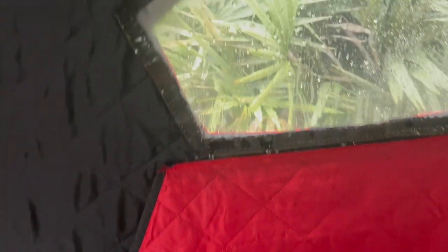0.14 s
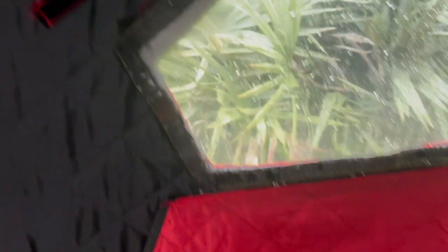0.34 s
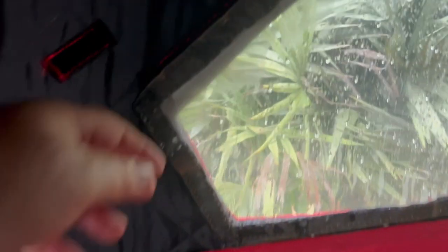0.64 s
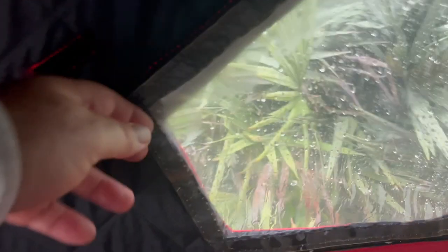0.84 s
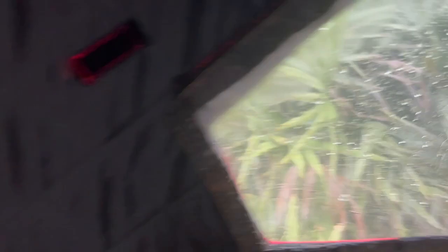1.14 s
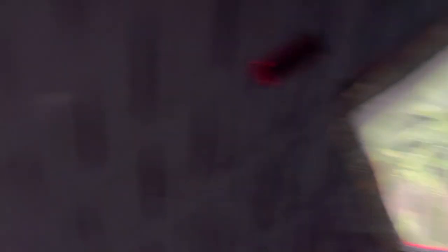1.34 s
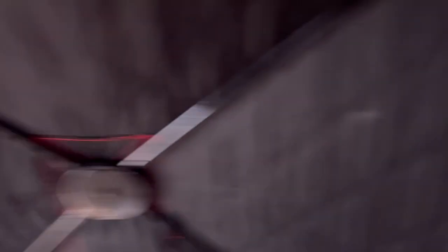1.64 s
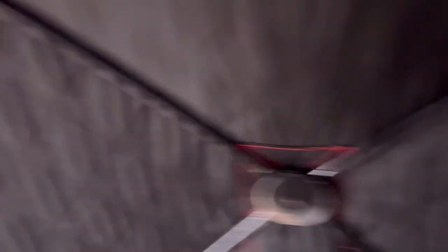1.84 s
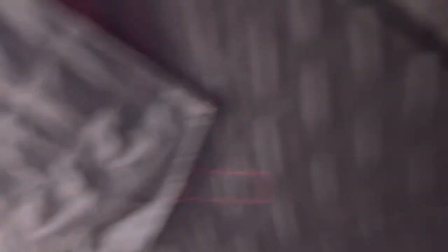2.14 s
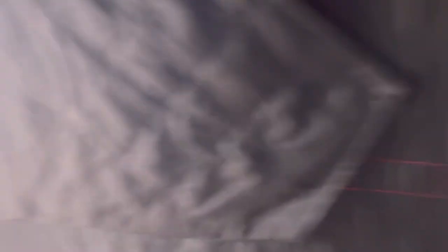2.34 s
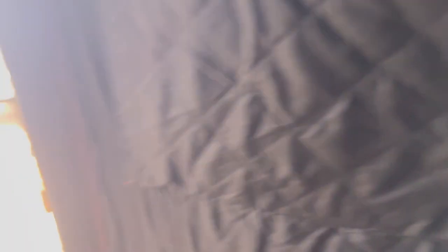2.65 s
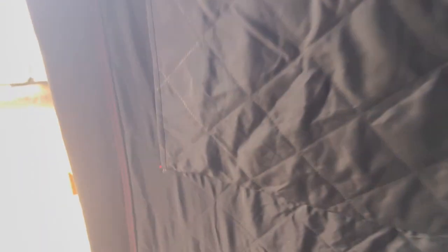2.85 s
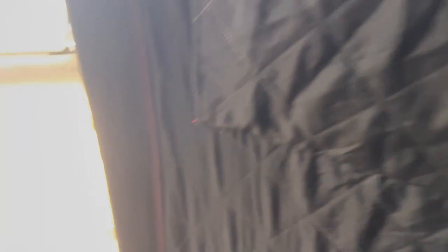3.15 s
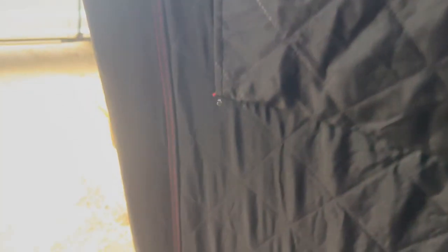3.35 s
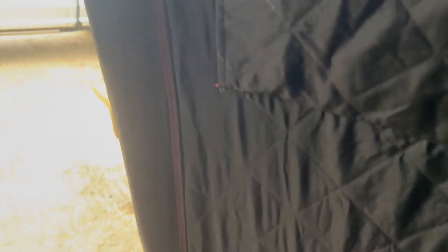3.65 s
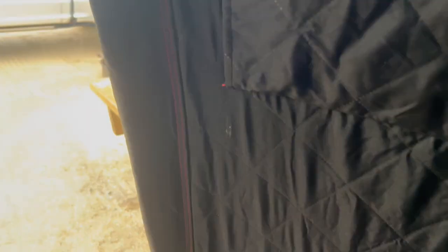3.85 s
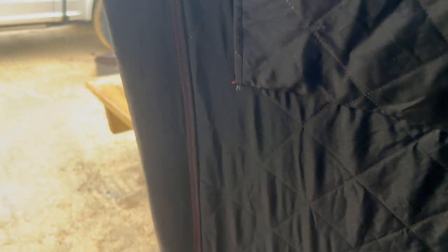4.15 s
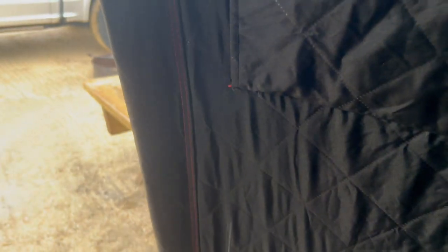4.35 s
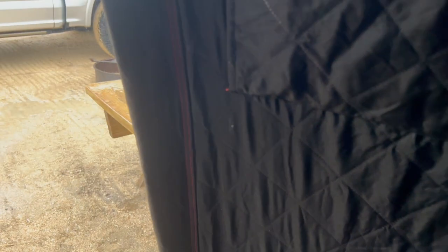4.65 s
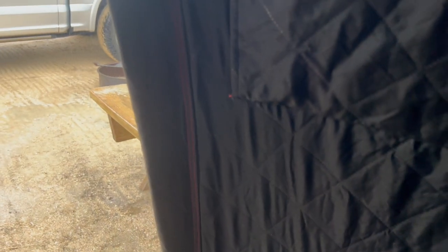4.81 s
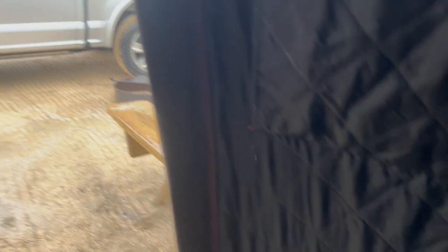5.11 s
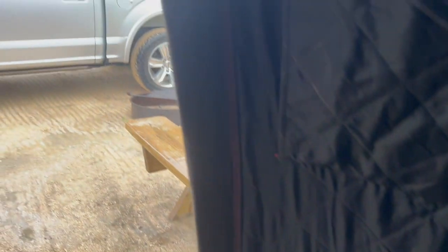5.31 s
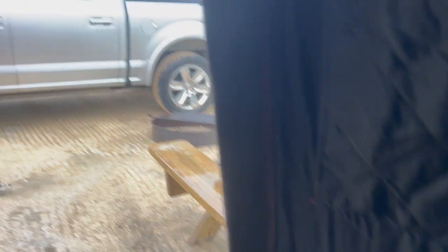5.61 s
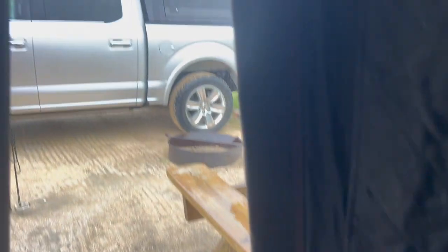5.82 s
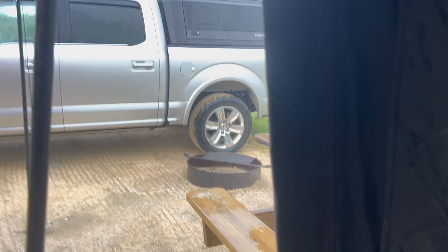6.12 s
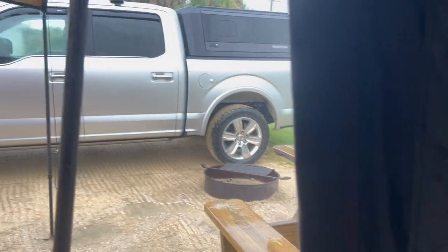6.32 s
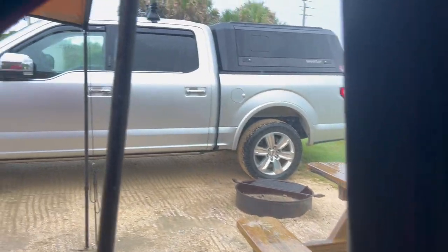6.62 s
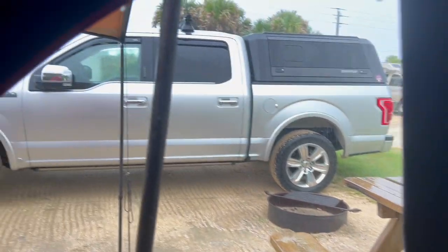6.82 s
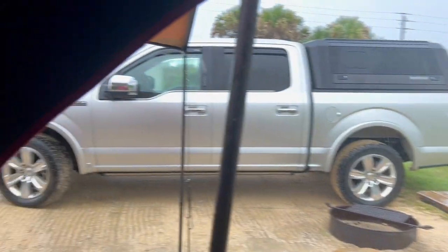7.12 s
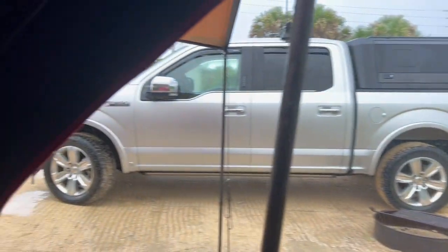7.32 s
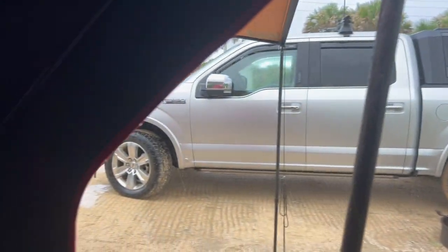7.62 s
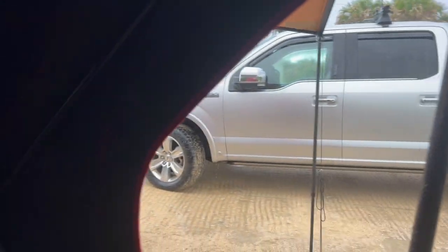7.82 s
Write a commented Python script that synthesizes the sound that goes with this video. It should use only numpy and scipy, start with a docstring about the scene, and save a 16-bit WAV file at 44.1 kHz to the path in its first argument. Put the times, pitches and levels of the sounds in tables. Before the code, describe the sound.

Low machine throb and blowing air fill a tent while rain hisses on taut fabric; a few sharp drops snap close overhead later on.

```python
"""An air conditioner rumbles, blows and hums, heard inside a tent in steady rain.
Its noise bands and wavering tones reach the two microphone ports of a handheld camera turning from window to door.
Rain is noise mixed with random taps: a wash over the site and ticking on the taut roof.
A few fat drops, short ringing packets with tent echoes, snap close overhead.
Near the start a hand lets go of the window flap: a burst of cloth noise brushes by and a few taps flick."""
import sys
import numpy as np
from scipy import signal
from scipy.fft import rfft, irfft, next_fast_len
from scipy.io import wavfile
from scipy.ndimage import uniform_filter1d, map_coordinates

SR = 44100
rng = np.random.default_rng(int(sys.argv[2]) if len(sys.argv) > 2 else 0)


def digitize_waveform(pressure):
    """Quantize a signal to 16-bit integers and store it at the path in sys.argv[1].

    Rows of a 2-D input are taken as channels; values are limited to [-1, 1].
    """
    field = np.atleast_2d(pressure).T
    bounded = np.clip(field, -1, 1)
    quanta = np.round(bounded * 32767).astype(np.int16)
    wavfile.write(sys.argv[1], SR, quanta)


N = 351374

# fainter tones of the machine: pitch_hz, level_db, width_hz
WHINES = [(54, -33, 5), (171, -34, 4), (200, -41, 3), (757, -53, 8), (882, -50, 6), (2765, -62, 15),
          (5810, -62, 40), (6155, -66, 12)]
# clearest drops on the roof, before the sheet colours them:
# start_s, level_db (over 1 ms), pitch_hz, ring_cycles, left_lead_ms
DROPS = [(0.619, -28, 5200, 0.33, 0.4), (0.7944, -29, 4970, 0.25, 0.014), (1.6878, -39, 11500, 0.46, 0),
         (1.926, -40, 7000, .3, -0.031), (1.999, -30.5, 5800, 0.33, 0.0025), (2.1, -41, 7500, 0.42, 0),
         (2.332, -32.5, 7000, 0.58, .3), (2.418, -33.5, 11000, 0.44, 0), (2.598, -32, 5800, 0.48, 0.025),
         (2.8704, -35, 10300, 0.46, 0), (3.0465, -40, 11000, .4, 0), (3.2158, -40, 5000, .3, 0),
         (3.332, -33, 10500, 0.49, .15), (3.4062, -32, 4500, 1.1, 0.015), (3.6744, -45, 9500, .4, 0),
         (3.79, -33, 9300, 0.67, -.2), (3.937, -31.5, 7800, .35, 0.032), (4.122, -32, 5800, 0.39, 0.0065),
         (4.1886, -36, 9300, .4, 0), (4.2164, -36, 11500, .3, 0), (4.2531, -35, 8200, 0.3, 0),
         (4.3543, -38, 11500, .35, 0), (4.444, -35, 6000, .7, 0), (4.6124, -35, 11500, .4, 0),
         (4.6847, -30, 5600, 0.27, 0.023), (4.7675, -35.5, 7700, 0.55, 0), (4.808, -29, 8800, 0.26, .3),
         (4.9181, -39, 8800, .3, 0), (5.022, -16.5, 5400, 0.45, 0.24), (5.101, -39, 8500, 0.44, 0),
         (5.154, -36, 8300, 1, .4), (5.402, -32, 7000, .35, .4), (5.4692, -31.5, 5200, 0.77, 0),
         (5.513, -31, 9600, .4, 0), (5.5474, -38, 9000, .25, 0), (5.5654, -33, 10000, .35, 0.034),
         (5.8995, -33, 12000, 0.22, .4), (6.0403, -19, 7360, 0.34, 0), (6.0639, -35, 8800, .5, 0),
         (6.1464, -30, 7160, 0.44, -0.43), (6.205, -32, 7400, 0.34, 0), (6.264, -34, 7000, .5, 0),
         (6.3588, -33.5, 8800, 0.36, 0), (6.6778, -28, 8100, 1.1, 0.072), (6.6795, -20, 5500, 0.85, 0.014),
         (6.8324, -31.5, 8900, 0.7, -.4), (6.851, -37, 7800, .7, 0), (7.306, -35.5, 8600, .35, 0),
         (7.6181, -35, 11200, 0.5, 0), (7.7909, -41, 11500, .4, 0)]
# drops that ring on with a tiny plip: start_s, level_db (over 1 ms, before the sheet), pitch_hz, ring_cycles
PLIPS = [(.619, -39, 5400, 6), (3.407, -37, 4900, 6), (4.1217, -33.5, 5550, 8)]
# the flap snaps straight, with small catches before and after:
# start_s, level_db (over 1 ms, before the sheet), pitch_hz, ring_cycles
FLICKS = [(.9348, -31, 8500, 0.45), (.9362, -34, 4080, 1), (.9378, -27, 10500, 0.9),
          (.939, -24.5, 4220, 1.2), (.9392, -28, 8000, 0.39), (.955, -37, 6000, .4), (.988, -38, 5200, .4)]

# spectra of each layer: frequency_hz, relative_level_db
THROB_SPECTRUM = [(15, -42), (27, -23), (38, -12.5), (52, 1.5), (64, -0.5), (85, -12), (150, -27),
                  (600, -120)]
RUMBLE_SPECTRUM = [(35, -46), (58, -6.5), (78, 0), (115, 0), (165, -3.5), (215, -16.5), (300, -29),
                   (600, -90), (2500, -120)]
AIR_SPECTRUM = [(120, -13), (220, 0), (290, 1.5), (400, -1), (470, -1.5), (600, -10), (900, -19.5),
                (2500, -53), (9000, -120)]
WASH_SPECTRUM = [(250, -24), (550, 3.5), (720, 1), (900, -2), (1100, -0.5), (1500, -3.5), (2000, -7.5),
                 (3000, -18.5), (5000, -26.5), (15000, -76)]
HISS_SPECTRUM = [(1200, -2.5), (2800, 9.5), (4000, 6), (5000, 5), (6000, 6.5), (7200, 0.5), (9000, -0.5),
                 (10600, -6.5), (12000, -20.5), (13500, -17), (15500, -14.5)]
CLOTH_SPECTRUM = [(2000, -32), (3200, -1), (4200, 1), (5500, -3), (8000, -7.5), (11200, -2.5), (12500, -17),
                  (15500, -8)]
# treble radiated by the stiff sheet: frequency_hz, gain_db
SHEET_SPECTRUM = [(2000, -50), (2900, -11), (3700, 3), (9500, 2), (11000, 3.5), (12800, -9), (15500, 7)]
# the thin walls return the highs of the drops a little more strongly: frequency_hz, gain_db
WALL_RETURN = [(4000, 1), (6000, 1.5), (8500, 1.5), (12000, 4)]

# likeness of a surrounding sound at the two microphone ports: frequency_hz, correlation (no unit)
PORT_LIKENESS = [(60, 1), (140, 0.96), (220, 0.97), (330, 0.74), (500, 0.65), (780, 0.15), (1100, 0.33),
                 (1700, 0.07), (2400, 0.46), (4300, 0.3), (5400, 0.22), (7000, 0.28), (8300, 1), (16000, 1)]
# phase between the ports: frequency_hz, left_lead_rad
PORT_PHASE = [(100, 0.065), (480, -0.52), (870, 0.96), (1600, -1.3), (2700, 0.73), (7500, 0.97),
              (8400, -0.11)]
# decay of the tent's scatter: frequency_hz, t60_s
TENT_DECAY = [(2000, 0.027), (6000, 0.11), (14000, 0.21)]
# echoes of the nearest wall and floor: delay_s, level_db
ECHOES = [(.0021, -16), (.0069, -12.5), (.0081, -18)]
# the microphone passes a crest (+) or node (-) of a standing wave: time_s, frequency_hz, gain_db
PASSES = [(.45, 461, 8), (1.45, 590, -11), (1.1, 780, 6.5), (2.1, 298, 6.5), (2.35, 570, 3),
          (4.3, 290, -10), (5.95, 502, 6.5), (7.0, 185, 7), (7.5, 826, 5.5)]

# deep throb of the cabinet, before its trim: time_s, level_db
THROB_LEVEL = [(0, -22.5), (.8, -24.5), (1.5, -31), (2.1, -21.5), (2.45, -24), (2.9, -21), (4.15, -31),
               (5.4, -22), (6.1, -26.5), (7.1, -36), (7.5, -18), (7.95, -31)]
# duct rumble, before its surges: time_s, level_db
RUMBLE_LEVEL = [(0, -21.5), (.4, -17), (1.3, -19), (2.05, -17.5), (3.1, -17.5), (3.5, -17.5), (4.1, -19),
                (5.3, -18.5), (5.8, -21.5), (6.4, -19.5), (7.7, -19)]
# swells added to the compressor's low bed: time_s, half_duration_s, peak_db
COMPRESSOR_SWELLS = [(2.7, 0.45, -41), (5.65, 0.42, -30), (6.95, 0.24, -34.5)]
# the patter thickens (+) or thins (-): time_s, half_duration_s, gain_db
RAIN_SWELLS = [(2.46, 0.12, 1.5), (3.08, 0.12, -0.2), (6.5, 0.18, 1.5), (1.9, 0.63, -2)]

THROB_TRIM_DB = -1.9
SURGE_DB, SURGES_PER_S = 0.6, 14  # depth and rate of the rumble's random surges
AIR_DB, AIR_RISE_DB_PER_S = -29, 0.02  # level at the start, almost steady
FAN_HZ, FAN_SAG_S, SAG_HZ_PER_S = 335.2, 4.1, 2.9  # the sag begins at FAN_SAG_S
FAN_DB, SAG_DB_PER_S = -34.8, 1.1
FAN_SHADE_DB, FAN_SHADE_S = 9.5, 0.42  # deficit at the start, lifting as the microphone leaves the window
COMPRESSOR_DB, COMPRESSOR_HZ, COMPRESSOR_SAG_HZ_PER_S = -50.5, 232, 0.53
# rain at the start, before the mix inside each layer, growing as the microphone nears the door
WASH_DB, WASH_DB_PER_S = -34.5, 0.18
HISS_DB, HISS_DB_PER_S = -44.5, 0.21
PATTER_HZ, PATTER_OCTAVES = 2000, 0.68  # centre and half width of the band that swells
# the flap sliding off the fingers: a quick rise, a peak, a slow slide and a release
BRUSH_S, BRUSH_DB, BRUSH_RISE_DB_PER_S = 0.926, -33.5, 260
BRUSH_SLIDE_S, BRUSH_SLIDE_DB_PER_S = 0.079, 95
BRUSH_RELEASE_DB_PER_S = 450  # added to the slide's fall
SHEET_LEAD_S_PER_HZ = 8e-8  # highs run ahead of lows
PASS_WIDTH, PASS_S = 0.059, 0.45  # half width as a share of the frequency, half duration
RIPPLE_DB, RIPPLE_FROM_HZ = 1.3, 550  # rms depth and lowest frequency
DIRECTION_TOP_HZ = 7200  # single drops have a direction only below this
TREBLE_LAG_S = 1 / 3600  # left port behind right above the last PORT_PHASE point
TOP_HZ = 15900  # upper band limit of the microphone


def amp(db):
    """Decibels to gain."""
    return 10 ** (np.asarray(db) / 20)


def unit(x):
    """x at rms 1."""
    return x / np.sqrt(np.mean(x ** 2) + 1e-20)


def seconds():
    """The time of every sample."""
    return np.arange(N) / SR


def along(points, hz):
    """Values of (Hz, value) points, read on a log frequency axis."""
    f, v = np.transpose(points)
    return np.interp(np.log(hz + 1), np.log(f + 1), v)


def curve(rows):
    """(s, value) rows joined by straight lines, one value per sample."""
    s, value = np.transpose(rows)
    return np.interp(seconds(), s, value)


def bell(centre_s, half_s):
    """A smooth swell of height 1 that falls to 1/e at half_s from its centre."""
    return np.exp(-((seconds() - centre_s) / half_s) ** 2)


def wobble(rate):
    """A smooth random curve, rate knots a second."""
    s = np.arange(0, N / SR + .001, .001)
    knots = rng.standard_normal(int(N * rate / SR) + 4)
    return np.interp(seconds(), s, map_coordinates(knots, [s * rate]))


def random_field(shape, hz_bins, frames):
    """Smoothed random values of rms 1 over frequency and time."""
    field = uniform_filter1d(rng.standard_normal(shape), size=hz_bins, axis=0)
    return unit(uniform_filter1d(field, size=frames, axis=1))


def filtered(x, response):
    """x times a complex response of frequency."""
    m = next_fast_len(N + 8192)
    return irfft(rfft(x, m) * response(np.fft.rfftfreq(m, 1 / SR)), m)[..., :N]


def coloured(x, spectrum):
    """x through a (Hz, dB) spectrum."""
    return filtered(x, lambda hz: amp(along(spectrum, hz)))


def diffuse(pair):
    """Two unrelated signals mixed to the likeness of a sound from all around at the two ports."""
    def mid_side_gains(hz):
        turn = np.arccos(np.clip(along(PORT_LIKENESS, hz), -1, 1)) / 2
        return np.array([np.cos(turn), np.sin(turn)])
    mid, side = filtered(pair, mid_side_gains)
    return np.array([mid + side, mid - side])


def even_noise(spectrum):
    """Steady stereo noise of rms 1."""
    return unit(coloured(diffuse(rng.standard_normal((2, N))), spectrum))


def rush(spectrum, patchy_db):
    """Stereo noise of rms 1 with patches of random gain over frequency and time."""
    z = signal.stft(rng.standard_normal((2, N)), nperseg=512)[2]
    patches = amp(patchy_db * random_field(z.shape[1:], hz_bins=8, frames=12))
    pair = signal.istft(z * patches, nperseg=512)[1][:, :N]
    return unit(coloured(diffuse(pair), spectrum))


def through_tent(x):
    """Narrow bands swell or dip as the microphone crosses standing waves; many higher ones ripple."""
    hz, t, z = signal.stft(x, SR, nperseg=4096)
    gain_db = 0
    for s, centre_hz, db in PASSES:
        off_centre = (hz[:, None] / centre_hz - 1) / PASS_WIDTH
        gain_db = gain_db + db * np.exp(-((t - s) / PASS_S) ** 2 - off_centre ** 2)
    ripple = random_field(z.shape[1:], hz_bins=7, frames=9)
    gain_db = gain_db + RIPPLE_DB * ripple * (hz[:, None] > RIPPLE_FROM_HZ)
    return signal.istft(z * amp(gain_db), SR, nperseg=4096)[1][:, :N]


def air_conditioner():
    """Cabinet throb, duct rumble and an air stream, with the tones of fan and compressor."""
    throb = amp(curve(THROB_LEVEL) + THROB_TRIM_DB) * even_noise(THROB_SPECTRUM)
    rumble_db = curve(RUMBLE_LEVEL) + SURGE_DB * wobble(SURGES_PER_S)
    rumble = amp(rumble_db) * even_noise(RUMBLE_SPECTRUM)
    air_db = AIR_DB + AIR_RISE_DB_PER_S * seconds()
    air = amp(air_db) * through_tent(rush(AIR_SPECTRUM, patchy_db=0.8))
    # two-row gains are the left and right port, in dB
    low_noise = (throb + rumble) * amp([[.25], [-.25]])
    return low_noise + air + fan() * amp([[-1], [1]]) + compressor() + whines()


def hum(hz, waver_hz, flutter_db):
    """A machine tone of rms 1, unsteady in speed and strength."""
    phase = 2 * np.pi * np.cumsum(hz + waver_hz * wobble(12)) / SR
    return unit(np.sin(phase) * amp(flutter_db * wobble(4.3)))


def fan():
    """The fan's tone comes forward, wavers about one pitch, then slowly sags and fades."""
    sag_s = np.maximum(seconds() - FAN_SAG_S, 0)
    level_db = FAN_DB - FAN_SHADE_DB * bell(0, FAN_SHADE_S) - SAG_DB_PER_S * sag_s
    return amp(level_db) * hum(FAN_HZ - SAG_HZ_PER_S * sag_s, waver_hz=0.7, flutter_db=2.7)


def compressor():
    """A low, slowly sinking tone that swells out of a faint bed."""
    swells = sum(amp(db) * bell(s, half_s) for s, half_s, db in COMPRESSOR_SWELLS)
    hz = COMPRESSOR_HZ - COMPRESSOR_SAG_HZ_PER_S * seconds()
    return (amp(COMPRESSOR_DB) + swells) * hum(hz, waver_hz=0.36, flutter_db=1.0)


def whines():
    """Fainter machine tones, each broadened by a random strength at either port."""
    tones = 0
    for hz, db, width_hz in WHINES:
        strength = unit(np.array([wobble(2 * width_hz), wobble(2 * width_hz)]))
        tones = tones + amp(db) * strength * hum(hz, waver_hz=1.43, flutter_db=1.5)
    return diffuse(tones)


def taps(rows, size=160):
    """Taps on taut fabric, rows (s, dB, Hz, cycles): wave packets that rise fast and ring away."""
    s, db, hz, cycles = np.transpose(rows)[:, :, None]
    k = np.arange(size)
    turns = np.clip(hz, 2500, 14000) * k / SR
    envelope = turns * np.exp(-turns / np.maximum(cycles, .1))
    packet = envelope * np.sin(2 * np.pi * (turns + rng.random(s.shape)))
    # each packet carries the energy of its level held for one millisecond
    packet *= amp(db) * np.sqrt(SR / 1000 / np.sum(packet ** 2, axis=1, keepdims=True))
    places = np.round(s * SR).astype(int) + k
    return np.bincount(places.ravel(), packet.ravel(), N)[:N]


def shower(count, pitch_hz, spread_db, cycles):
    """Random taps from all around: most lie near one level, a few far above (below if spread is negative)."""
    def one_port():
        size = np.minimum(rng.exponential(size=count), 3)
        hz = pitch_hz * np.exp(0.3 * rng.standard_normal(count))
        s = rng.random(count) * N / SR
        return taps(np.column_stack([s, spread_db * size, hz, np.full(count, cycles)]))
    return diffuse(np.array([one_port(), one_port()]))


def rain():
    """Far rain is a soft wash with dull patter; on the tent it is a hiss full of fine drops."""
    wash_db = WASH_DB + WASH_DB_PER_S * seconds()
    hiss_db = HISS_DB + HISS_DB_PER_S * seconds()
    flurry_db = 0.48 * wobble(24)  # the level flickers as drops arrive in small clumps
    patter = shower(count=1300, pitch_hz=3260, spread_db=2.0, cycles=0.27)
    wash = amp(1.91) * rush(WASH_SPECTRUM, patchy_db=1.1) + amp(-8) * unit(coloured(patter, WASH_SPECTRUM))
    swell_db = sum(db * bell(s, half_s) for s, half_s, db in RAIN_SWELLS)
    band = filtered(wash, lambda hz: np.exp(-(np.log2((hz + 1) / PATTER_HZ) / PATTER_OCTAVES) ** 2))
    wash = wash + (amp(swell_db) - 1) * band
    fine = shower(count=1800, pitch_hz=5100, spread_db=6.5, cycles=0.72)
    hiss = amp(1.5) * rush(HISS_SPECTRUM, patchy_db=1.7) + amp(-7.5) * unit(coloured(fine, HISS_SPECTRUM))
    far = amp(wash_db) * wash * amp([[-1], [1]])
    near = amp(hiss_db) * hiss * amp([[.7], [-.7]])
    return amp(flurry_db) * through_tent(far + near)


def fabric(x):
    """The stiff coated sheet radiates mostly treble, and carries the highs a little ahead of the lows."""
    def sheet(hz):
        lead = np.exp(1j * np.pi * SHEET_LEAD_S_PER_HZ * (hz - 7000) ** 2)
        return amp(along(SHEET_SPECTRUM, hz)) * lead
    return filtered(x, sheet)


def placed(x, s, lead_ms):
    """A time lead at one port sets each drop's direction; its top treble stays in the middle."""
    n = np.arange(N)
    body = filtered(x, lambda hz: hz < DIRECTION_TOP_HZ)
    shift = np.interp(seconds(), s, lead_ms) / 1000 * SR / 2  # samples, half at each port
    return x - body + np.array([map_coordinates(body, [n + shift]), map_coordinates(body, [n - shift])])


def tent_echo(x, scatter_db):
    """Wall and floor return distinct echoes, joined by a short scatter that decays by frequency."""
    hz, t, z = signal.stft(rng.standard_normal((2, SR // 8)), SR, nperseg=128)
    decay = amp(-60 * t / along(TENT_DECAY, hz)[:, None])
    tail = signal.istft(z * decay, SR, nperseg=128)[1]
    tail[:, :SR // 600] = 0  # no scatter before the nearest surface
    scatter = signal.fftconvolve(x[None], tail / np.linalg.norm(tail[0]), axes=1)[:, :N]
    early = sum(amp(db) * np.pad(x, (round(s * SR), 0))[:N] for s, db in ECHOES)
    return early + amp(scatter_db) * diffuse(scatter)


def roof_drops():
    """Single drops snap on the roof and scatter round the tent."""
    drops = np.array(DROPS)
    snaps = fabric(taps(drops[:, :-1]) + taps(PLIPS, size=600))
    direct = placed(snaps, drops[:, 0], drops[:, -1]) * amp([[.6], [-.6]])
    return direct + tent_echo(coloured(snaps, WALL_RETURN), scatter_db=-8.5)


def flap():
    """Nylon slides off the fingers, catching on the skin, and flicks back against the window."""
    t = seconds() - BRUSH_S
    rise_db = BRUSH_RISE_DB_PER_S * np.minimum(t, 0)
    slide_db = BRUSH_SLIDE_DB_PER_S * np.maximum(t, 0)
    release_db = BRUSH_RELEASE_DB_PER_S * np.maximum(t - BRUSH_SLIDE_S, 0)
    level_db = BRUSH_DB + rise_db - slide_db - release_db
    catches = shower(count=4000, pitch_hz=7000, spread_db=-1, cycles=0.27)
    catches = unit(coloured(catches, CLOTH_SPECTRUM))
    brush = amp(level_db) * unit(even_noise(CLOTH_SPECTRUM) + amp(-3) * catches)
    flick = fabric(taps(FLICKS))
    return brush + flick + tent_echo(flick, scatter_db=-14)


def scene():
    """Everything heard inside the tent."""
    return air_conditioner() + rain() + roof_drops() + flap()


def record(dry):
    """The ports differ in phase, the left lagging more and more in the treble, up to the band limit."""
    def ports(hz):
        lag = 2 * np.pi * TREBLE_LAG_S * np.maximum(hz - PORT_PHASE[-1][0], 0)
        lead = along(PORT_PHASE, hz) - lag
        return np.exp(.5j * np.array([lead, -lead])) * (hz < TOP_HZ)
    return filtered(dry, ports)


dry = scene()
out = record(dry)
digitize_waveform(out)
```